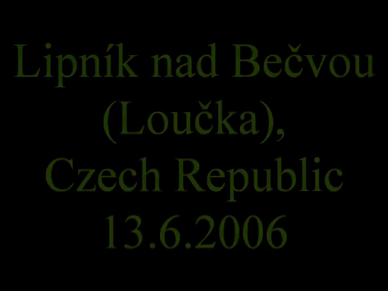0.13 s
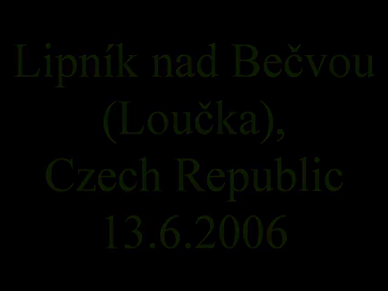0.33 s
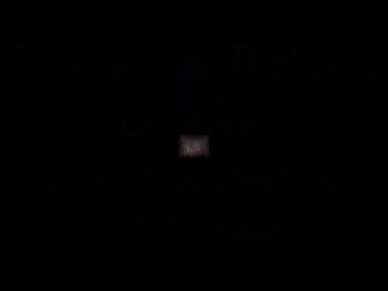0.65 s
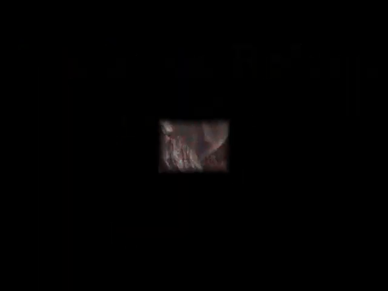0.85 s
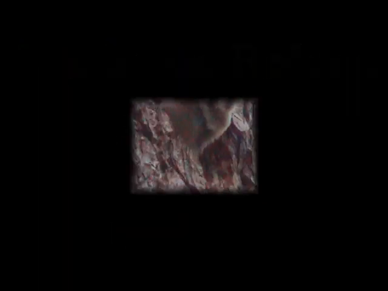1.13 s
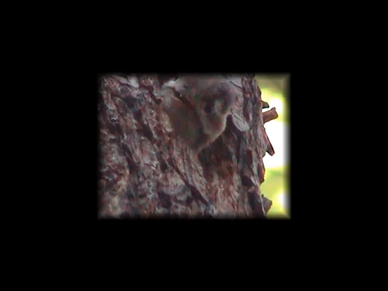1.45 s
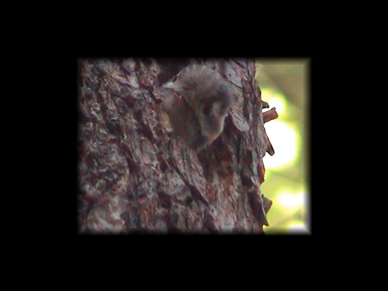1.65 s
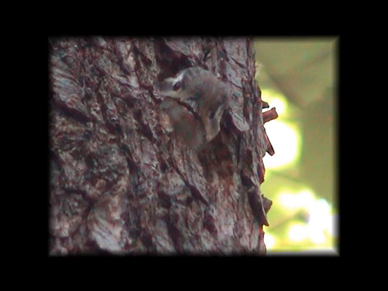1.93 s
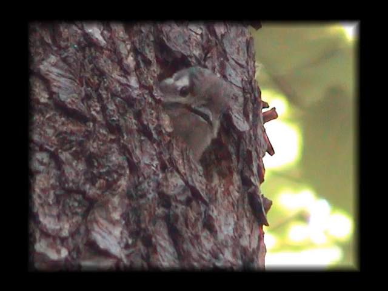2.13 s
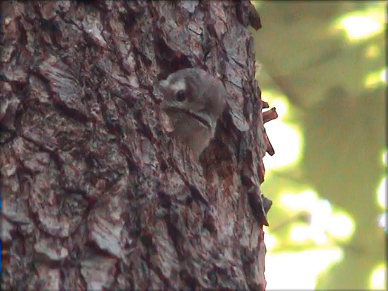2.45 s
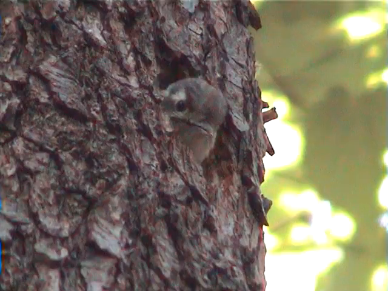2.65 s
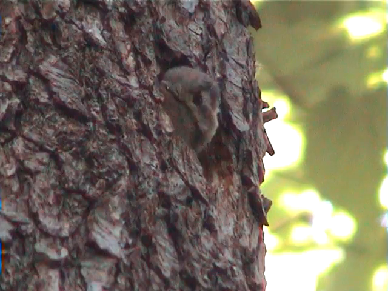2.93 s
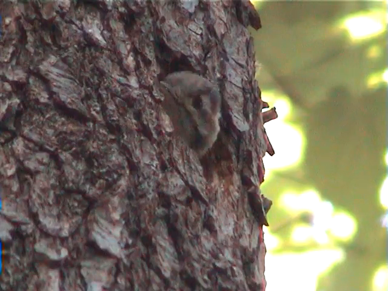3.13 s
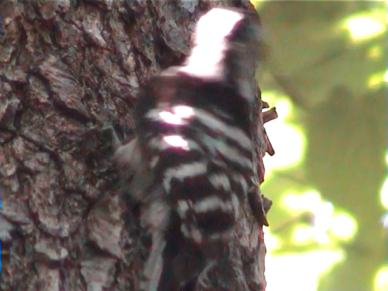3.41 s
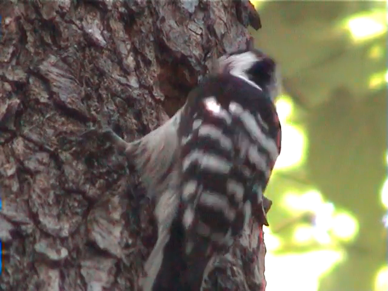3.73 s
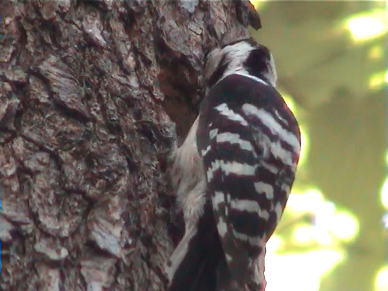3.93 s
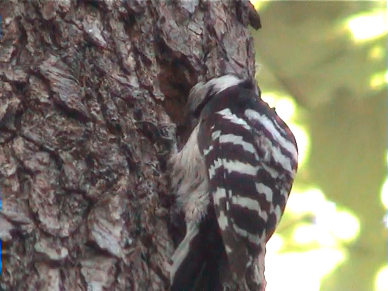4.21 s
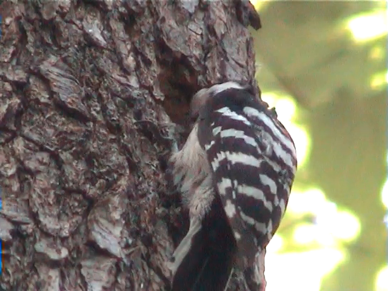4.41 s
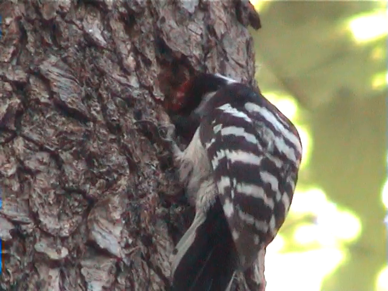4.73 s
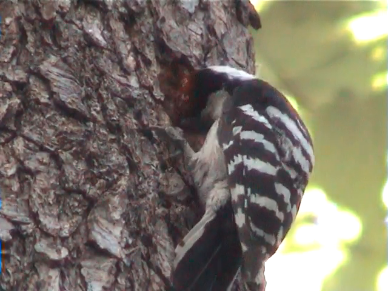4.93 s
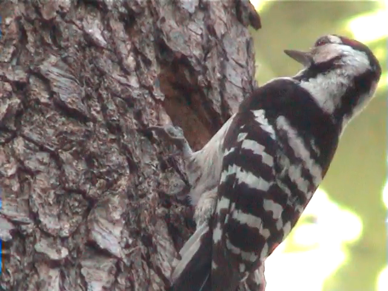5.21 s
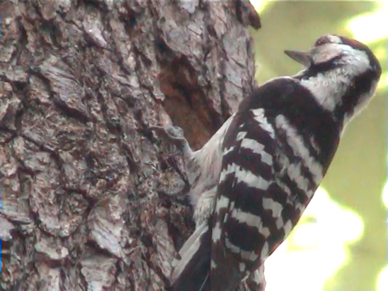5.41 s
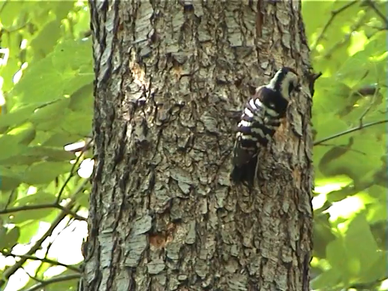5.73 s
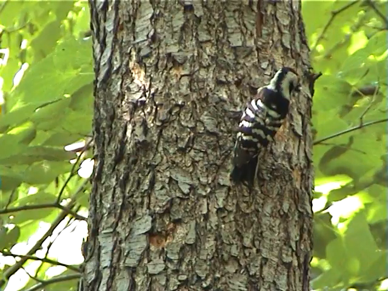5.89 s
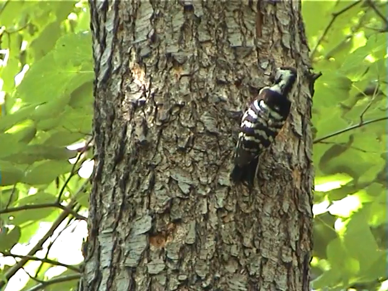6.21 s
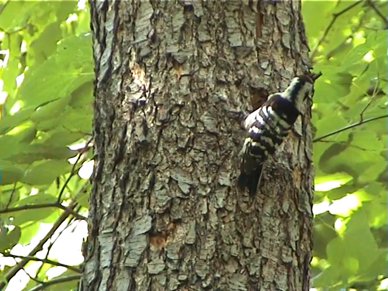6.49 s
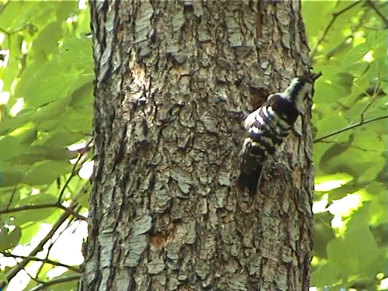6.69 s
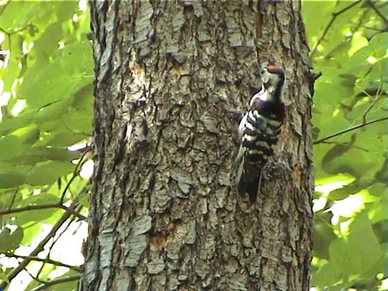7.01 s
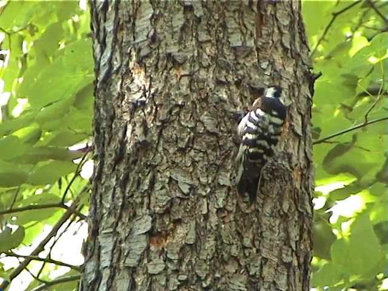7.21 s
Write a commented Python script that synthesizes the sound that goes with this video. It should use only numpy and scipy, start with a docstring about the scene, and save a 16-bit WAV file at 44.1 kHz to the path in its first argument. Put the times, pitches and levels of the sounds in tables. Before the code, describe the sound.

A woodpecker chick begs in rapid, thin, raspy chirps from a tree hole, then slower calls sound farther off over a forest rush.

```python
"""A woodpecker nestling begs from its hole in a trunk with fast, thin, arched notes; it ducks inside when the parent
lands, and slower calls follow from farther off. Each note is a gliding whistle with overtones that breaks into a
short rasp. Filtered noise makes the ring of the hollow, the scatter of the bark and the echo of the wood.
Behind lies a steady forest rush with a faint whine, and later a low motor-like drone. The sound fades in."""
import sys
import numpy as np
from scipy import signal
from scipy.fft import rfft, irfft, next_fast_len
from scipy.io import wavfile
from scipy.ndimage import map_coordinates

SR = 44100
rng = np.random.default_rng(int(sys.argv[2]) if len(sys.argv) > 2 else 0)


def to_wav(sig):
    """Store sig (one row per channel, or 1-D mono) as 16-bit WAV at the path in sys.argv[1].

    Samples outside -1..1 are clipped; the rate is SR.
    """
    pcm = np.clip(np.atleast_2d(sig), -1, 1) * 32767
    pcm = np.round(pcm).astype(np.int16)
    wavfile.write(sys.argv[1], SR, pcm.T)  # frames by channels


N = 324135  # length in samples

# The begging series at the hole, about nine a second. Each row: start in seconds, length in seconds, middle pitch in Hz.
BEGGING_NOTES = [(.669, .028, 2740), (.7738, .032, 2974), (.8823, .03, 3020), (.993, .028, 3005),
                 (1.0973, .027, 2995), (1.2014, .028, 2975), (1.305, .027, 3020), (1.412, .031, 3050),
                 (1.52, .031, 3085), (1.63, .033, 3026), (1.7494, .028, 3000), (1.8619, .026, 3020),
                 (1.9735, .029, 3045), (2.0871, .027, 2995), (2.1974, .027, 3000), (2.312, .025, 3010),
                 (2.42, .028, 3075), (2.533, .029, 3120), (2.653, .028, 3100), (2.769, .031, 3005),
                 (2.8835, .029, 3120), (2.9972, .03, 3075), (3.115, .024, 3040), (3.2262, .027, 3100)]
# How hard the bird sings while begging. Each row: time in seconds, effort in dB.
BEGGING_EFFORT = [(.68, -5.5), (.79, -.6), (1.2, -.5), (1.45, .9), (1.87, 1.3), (2.2, -.2), (2.55, 1.3),
                  (2.78, -.3), (3.23, -.7)]
# The mixed calls once the parent has landed.
# Each row: start in seconds, length in seconds, middle pitch in Hz, effort in dB, name of the note type.
MIXED_CALLS = [(3.332, .035, 3160, -.6, "lift"), (3.4607, .026, 3107, .5, "lift"),
               (3.5795, .031, 3630, -5.2, "squeak"), (3.699, .027, 3010, -2.6, "slide"),
               (3.8165, .029, 3035, -2.8, "slide"), (3.936, .029, 3010, -2.8, "slide"),
               (4.068, .025, 3085, -3, "slide"), (4.1885, .029, 3140, -2.1, "slide"),
               (4.33, .029, 3135, -1.9, "slide"), (4.448, .012, 2670, -12, "squeak"),
               (4.4717, .036, 3235, 1.8, "ring"), (4.621, .011, 2480, -12, "squeak"),
               (4.64, .04, 3070, -1.5, "lift"), (4.85, .015, 3050, -.7, "pip"),
               (5.021, .015, 3040, -1.8, "pip"), (5.2118, .02, 3100, -3, "drop"),
               (5.348, .026, 3680, -15, "squeak"), (5.5262, .025, 3190, -13.5, "whistle"),
               (5.6535, .036, 3050, -8, "pure"), (5.8039, .038, 3190, -2.7, "pure"),
               (5.947, .047, 3208, 1, "pure"), (6.1115, .044, 2980, .3, "bright"),
               (6.278, .047, 3040, .7, "bright"), (6.4942, .045, 2975, -1.3, "bright"),
               (6.6782, .011, 2930, -.5, "lift"), (6.69, .033, 3310, 1.3, "pure"),
               (6.8813, .035, 3110, -2, "bright"), (7.08, .026, 3060, -1.3, "lift"),
               (7.104, .019, 3230, .8, "bright"), (7.311, .039, 3086, -1.3, "bright")]
# The note types by name. Each row: starting pitch and final pitch as shares of the middle pitch, closing flick in Hz,
# then the 2nd, 3rd and 4th partial in dB over the fundamental at ordinary effort.
NOTE_TYPES = {"arch": (.893, .85, 120, 12.3, -4.1, -9.9), "lift": (.93, .972, 350, -1, -8.5, -10.5),
              "ring": (.9, .955, 100, -2, -15.5, -20), "slide": (1.055, .955, 830, .8, -9.3, -14.5),
              "pip": (.915, 1.02, 0, -4.5, -9, -8), "squeak": (1.1, .96, 100, -6, -21, -26),
              "drop": (1.07, .79, 250, -9, -16.5, -17.5), "whistle": (1.04, .82, 0, 21, -19, -24),
              "pure": (.9, .805, 150, 3.4, -24, -27), "bright": (.96, .86, 250, 2.3, -6, -10.3)}
# Loudness through one note. Each row: share of the note's length, level in dB.
NOTE_SWELL = [(0, 0.5), (.15, 1), (.45, .5), (.7, 0), (.86, -.5), (1, -9)]
# The soft slur that leads into a note, before each one is randomly hurried or stretched.
# Each row: seconds before the note, share of the way from starting pitch to the slur's top, level in dB.
LEAD_IN_SLUR = [(.022, .3, -34), (.013, .7, -24), (.005, 1, -15), (.002, .7, -9), (0, 0, -5)]
# Scratch of the syrinx (the bird's voice organ). Each row: frequency in Hz, relative level in dB per Hz.
RASP_SPECTRUM = [(1800, -40), (2700, 15), (4000, -5), (5300, 6.5), (7500, -9), (11000, -5), (13000, -25),
                 (16000, -28)]
# Colour of the way from beak to microphone, close by. Each row: frequency in Hz, relative level in dB.
NEAR_COLOUR = [(2500, -14), (3050, -4), (4000, -1.5), (5200, -1.5), (5950, 9), (6500, 12), (7500, 11.5),
               (8600, 9.5), (10000, 8), (11600, 4), (12400, -6.5), (13000, -4), (15500, -11)]
# The same from farther off, where the trunk cuts into it. Each row: frequency in Hz, relative level in dB.
FAR_COLOUR = [(2500, -5), (3100, -1), (4000, 6), (5000, -6.5), (5550, 7.5), (6080, -3), (6550, 7.5),
              (7500, -5), (9100, 6), (10200, -11), (12200, -5), (13200, -18)]
# How strongly the hollow rings after a call. Each row: time in seconds, gain in dB.
HOLLOW_RING = [(0, -12), (3.2, -14.5), (3.35, -11.5), (4.4, -6.5), (4.9, -2.5), (5.1, 5.5), (5.3, -12),
               (5.5, -22)]
# Resonances of the nest cavity. Each row: centre in Hz, width in Hz, strength in dB.
HOLLOW_RESONANCES = [(3069, 254, 1), (6073, 310, 3), (9340, 350, 2), (12200, 500, -15)]
# Echo among the trees. Each row: frequency in Hz, time to die away by 60 dB in seconds.
WOOD_DECAY = [(500, 0.27), (3000, 0.5), (6000, 0.57), (9000, 0.43), (14000, 0.18)]
# Colour of the forest rush. Each row: frequency in Hz, relative level in dB per Hz.
AIR_SPECTRUM = [(25, -5), (60, 1.5), (130, -2.5), (220, -1.5), (420, 0), (800, -1.5), (1500, -5),
                (2600, -4.5), (4300, -9), (7500, -16.5), (12000, -20.5), (15500, -28)]
# Loudness of the rush before the fade-in. Each row: time in seconds, level in dB.
RUSH_LEVEL = [(0, -48), (2.6, -49), (3.6, -48), (5.4, -49.5), (5.6, -49.5), (7.35, -49.5)]
# Faint steady whine before the fade-in. Each row: frequency in Hz, level in dB.
WHINE_TONES = [(1087, -69), (1572, -68.5), (1916, -69.5), (2024, -72)]
# Colour of the low drone. Each row: frequency in Hz, relative level in dB per Hz.
DRONE_SPECTRUM = [(15, -30), (30, -7), (55, -0.5), (72, -10), (85, -10), (102, -8), (120, -12), (200, -24),
                  (500, -80)]
# Pitch of the hum inside the drone. Each row: time in seconds, pitch in Hz.
HUM_PITCH = [(5.5, 98), (6.0, 102.1), (6.5, 99.6), (7.0, 103.3), (7.35, 106)]
# How alike left and right are in the noises. Each row: frequency in Hz, likeness (1 is identical).
LEFT_RIGHT_LIKENESS = [(50, 0.92), (100, 0.46), (170, 0.25), (700, 0.5), (1500, 0.29), (4000, 0.61),
                       (12000, 0.1)]
# Difference between the two microphones. Each row: frequency in Hz, left minus right in dB.
MICROPHONE_TILT = [(60, -1.8), (400, -2.8), (1300, -1.2), (3000, -2.2), (6000, .1), (12000, .5)]
# The fade-in. Each row: time in seconds, gain.
FADE_IN = [(.54, 0), (2.56, 0.94)]

FARTHER_FROM_S = 5.51  # seconds; from here on the tree is heard from farther off
NOTE_DB = -29.25  # fundamental of a note sung with ordinary effort, before swell, echoes and fade-in
BRIGHTENS = 1.05  # extra dB of the 2nd partial for each dB of effort
TOP_HZ = 15900  # nothing is heard above this


def amp(db):
    """Decibels to gain."""
    return 10 ** (np.asarray(db) / 20)


def unit(x):
    """Scale to an rms (average strength) of 1."""
    return x / np.sqrt(np.mean(x ** 2) + 1e-20)


def along(points, hz):
    """Read a table of (Hz, value) rows on a log frequency axis."""
    f, v = np.transpose(points)
    return np.interp(np.log(hz + 1), np.log(f + 1), v)


def read(rows, x):
    """Read a two-column table at x, in straight lines between its rows."""
    return np.interp(x, *np.transpose(rows))


def curve(rows):
    """Turn (seconds, value) rows into one value per sample."""
    return read(rows, np.arange(N) / SR)


def wobble(rate, size):
    """A smooth random curve with rate random points a second."""
    knots = rng.standard_normal(int(size * rate / SR) + 4)
    return map_coordinates(knots, [np.arange(size) * rate / SR])


def sine(pitch):
    """A pure tone whose phase adds up a changing pitch in Hz."""
    return np.sin(2 * np.pi * np.cumsum(pitch) / SR)


def filtered(x, response):
    """Make each frequency of x louder or softer by response(Hz)."""
    m = next_fast_len(N + SR // 2)
    return irfft(rfft(x, m) * response(np.fft.rfftfreq(m, 1 / SR)), m)[..., :N]


def woodpeckers():
    """Every call with the ring of the hollow, the scatter of the bark and the echo of the wood."""
    near_echo_db, far_echo_db, bark_db = -14, -13, -6
    fifth_db, rasp_db = -14, -15  # fifth partial over the third; rasp over the fundamental
    out = np.zeros((2, N + 2 * SR))
    lead, last_end = SR // 40, 0  # room in samples around each note; end of the note before in seconds
    for s, length, glide, flick_hz, levels in notes():
        t = np.arange(-lead, int(length * SR) + lead) / SR
        near = s < FARTHER_FROM_S
        colour, echo_db = (NEAR_COLOUR, near_echo_db) if near else (FAR_COLOUR, far_echo_db)
        # a note that follows straight on from the one before has no slur
        slurred = s - last_end > .006
        last_end = s + length

        partials_db = [*levels, levels[2] + fifth_db]
        call = note(t, length, glide, flick_hz, partials_db, colour, slurred)
        call += amp(levels[0] + rasp_db) * rasp(t, length, slurred, sag(*glide[1:]))

        heard = amp(read(HOLLOW_RING, s)) * signal.fftconvolve(call, hollow_tail())
        heard[:len(call)] += call
        scattered = amp(bark_db) * signal.fftconvolve(heard[None], bark_tail(), axes=1)
        echo = amp(echo_db) * signal.fftconvolve(heard[None], echo_tail(), axes=1)
        for part in (heard[None], scattered, echo):
            out[:, round(s * SR) - lead:][:, :part.shape[1]] += part
    return out[:, :N]


def notes():
    """Every note in order: its type sets the glide and overtones, and effort makes it louder and brighter."""
    begging = [(s, length, hz, read(BEGGING_EFFORT, s), "arch") for s, length, hz in BEGGING_NOTES]
    for s, length, hz, effort_db, kind in begging + MIXED_CALLS:
        start, end, flick_hz, second_db, third_db, fourth_db = NOTE_TYPES[kind]
        over_fundamental = np.array([0, second_db + BRIGHTENS * effort_db, third_db, fourth_db])
        levels = NOTE_DB + effort_db + over_fundamental
        yield s, length, (start * hz, hz, end * hz), flick_hz, levels


def note(t, length, glide, flick_hz, levels, colour, slurred):
    """One call: a slur, a glide of pitch, and an unsteady flick as the syrinx lets go."""
    crest, settle = 0.43, 0.88  # shares of the length where the middle and final pitch are reached
    flick_s, dull_s, release_s = 0.004, 0.015, 0.029  # the release falls 20 dB in release_s
    rasp_hz, rasp_depth = 140, 0.42  # pitch and loudness shake where roughness is 1
    start_hz, mid_hz, end_hz = glide
    u = t / length  # 0 to 1 through the note
    before, lift, soft_db = np.transpose(LEAD_IN_SLUR[::-1])
    before = before * rng.uniform(.6, 1.15)  # some slurs are hurried

    rise = np.clip(1 - u / crest, 0, 1) ** 2
    descent = np.clip((u - crest) / (settle - crest), 0, 1) ** 2.17
    pitch = mid_hz + (start_hz - mid_hz) * rise + (end_hz - mid_hz) * descent
    slur_top_hz = 3950 + 220 * rng.standard_normal()
    pitch += np.interp(-t, before, lift) * (slur_top_hz - start_hz)
    # the pitch flicks up as the note is released
    pitch += flick_hz * rng.uniform(.7, 1.3) * np.clip((t - length) / flick_s, 0, 1)
    # the vibration is steadiest in the middle and irregular in the slur and at the end
    rough = 0.12 + np.clip((u - .73) / 0.36, 0, 1) + np.clip(-t / 0.019, 0, 1)
    pitch += rasp_hz * rough * wobble(1300, len(t))
    phase = 2 * np.pi * np.cumsum(pitch) / SR

    swell_db = np.where(t < 0, np.interp(-t, before, soft_db), read(NOTE_SWELL, u))
    swell = amp(swell_db - 20 * np.maximum(t - length, 0) / release_s)
    onset_s = t[0] if slurred else -.002
    swell *= np.clip((t - onset_s) / 0.0015, 0, 1)
    swell *= 1 + rasp_depth * rough * wobble(902, len(t))

    body = (u > .06) & (u < .85)
    sound = np.zeros(len(t))
    for k, db in enumerate(levels, 1):
        gain = amp(along(colour, k * pitch) + 0.91 * wobble(164, len(t)))
        # the three low partials keep their given level; the colour weakens or lifts the top ones
        if k <= 3:
            gain /= np.sqrt(np.mean(gain[body] ** 2))
        # slur and flick are sung softly, so their overtones stay under the fundamental
        slur_db = min(db, levels[0] - 6 * (k - 1))
        level_db = np.interp(t, [-.002, .003, length, length + dull_s], [slur_db, db, db, slur_db])
        sound += amp(level_db) * gain * np.sin(k * phase) * (k * pitch < SR / 2)
    return sound * swell


def sag(mid_hz, end_hz):
    """How far a note sags at its end, 0.15-1: level notes close cleanly, falling ones break up."""
    return np.clip((mid_hz - end_hz) / 240, .15, 1)


def rasp(t, length, slurred, sagging):
    """Scratchy noise of the syrinx: in a slur a brief catch and an opening, then a closing that grows with sag."""
    late, width, early, catch_s, catch_width = .002, .0085, .008, .021, .003  # seconds
    opening_db, catch_db = -6, -9
    hz = np.fft.rfftfreq(len(t), 1 / SR)
    white = rng.standard_normal(len(t))
    noise = unit(irfft(rfft(white) * amp(along(RASP_SPECTRUM, hz)), len(t)))
    closing = sagging * np.exp(-((t - length - late) / width) ** 2)
    opening = amp(opening_db) * np.exp(-((t + early) / early) ** 2)
    opening += amp(catch_db) * np.exp(-((t + catch_s) / catch_width) ** 2)
    return noise * (slurred * opening + closing) * amp(5.5 * wobble(700, len(t)))


def hollow_tail():
    """Dense echoes inside the nest cavity, strongest around its resonances."""
    t60, build = 0.1, 0.0031  # seconds to die away by 60 dB, and to build up
    t = np.arange(SR // 4) / SR
    hz = np.fft.rfftfreq(len(t), 1 / SR)
    shape = sum(amp(db) / (1 + (2 * (hz - centre) / width) ** 2) for centre, width, db in HOLLOW_RESONANCES)
    decay = amp(-60 * t / t60) * (1 - np.exp(-t / build))
    return irfft(rfft(rng.standard_normal(len(t))) * shape, len(t)) * decay / np.linalg.norm(decay)


def bark_tail():
    """Rough bark scatters mostly treble, differently to each microphone."""
    t = np.arange(SR // 100) / SR
    burst = rng.standard_normal((2, len(t))) * np.exp(-t / 0.0016)
    scatter = np.diff(np.diff(burst))  # taking differences twice favours the treble
    return scatter / np.linalg.norm(scatter[0])


def echo_tail():
    """A fresh stereo answer of trunks and leaves: each frequency dies at its own speed."""
    hz, t, z = signal.stft(rng.standard_normal((2, SR // 2)), SR, nperseg=256)
    decay = amp(-60 * t / along(WOOD_DECAY, hz)[:, None]) * (1 - np.exp(-t / 0.002))
    tail = signal.istft(z * decay, SR, nperseg=256)[1]
    return tail / np.linalg.norm(tail[0])


def forest():
    """A steady rush of noise with a faint whine of wavering tones; a motor-like drone joins the later calls."""
    drone_db, hum_db = -55, -61
    t = np.arange(N) / SR
    air = amp(curve(RUSH_LEVEL) + 0.9 * wobble(2.89, N)) * rush(AIR_SPECTRUM)
    whine = sum(amp(db + wobble(2.98, N)) * unit(sine(hz + 7 * wobble(30, N))) for hz, db in WHINE_TONES)
    hum_level = amp(hum_db + 2.2 * wobble(5, N))
    hum = hum_level * unit(sine(curve(HUM_PITCH) + 1.62 * wobble(8.8, N)))
    drone = amp(drone_db) * rush(DRONE_SPECTRUM) + hum
    return air + whine + np.clip((t - FARTHER_FROM_S) / 0.02, 0, 1) * drone


def rush(spectrum):
    """Stereo noise of rms 1: a shared and an opposed part set how alike the two sides are at each frequency."""
    def shares(hz):
        turn = np.arccos(np.clip(along(LEFT_RIGHT_LIKENESS, hz), -1, 1)) / 2
        return amp(along(spectrum, hz)) * [np.cos(turn), np.sin(turn)]

    mid, side = filtered(rng.standard_normal((2, N)), shares)
    return unit(np.array([mid + side, mid - side]))


def scene():
    """The woodpecker calls over the forest."""
    return woodpeckers() + forest()


def record(dry):
    """The two microphones differ a little in tone; the sound fades in and stops short of the highest treble."""
    def sides(hz):
        tilt_db = along(MICROPHONE_TILT, hz)
        return amp(np.array([tilt_db, -tilt_db]) / 2) * (hz < TOP_HZ)

    return filtered(dry * curve(FADE_IN), sides)


dry = scene()
out = record(dry)
to_wav(out)
```